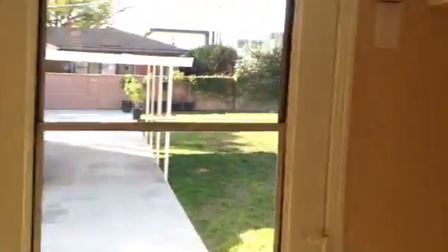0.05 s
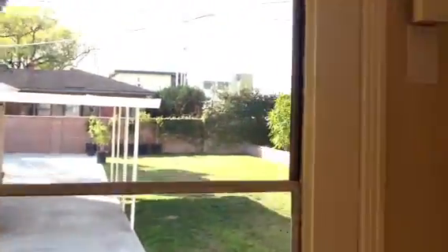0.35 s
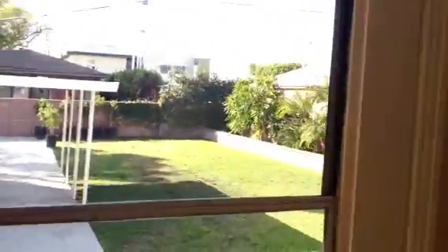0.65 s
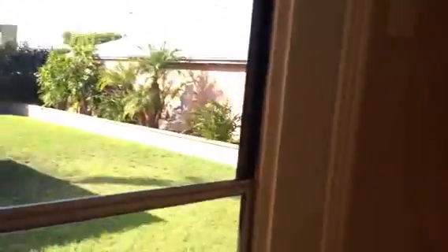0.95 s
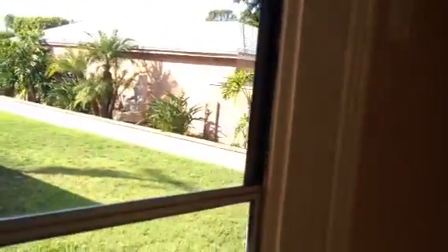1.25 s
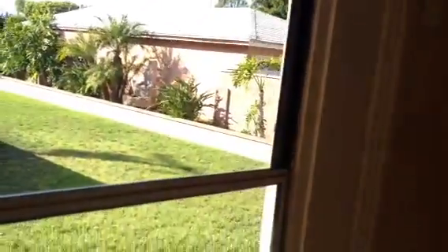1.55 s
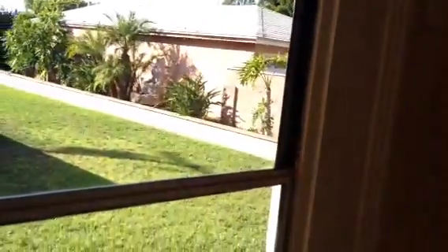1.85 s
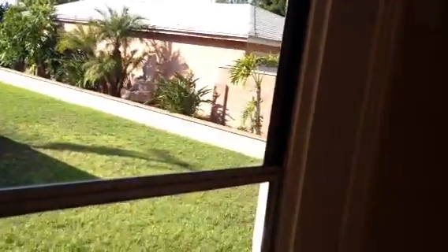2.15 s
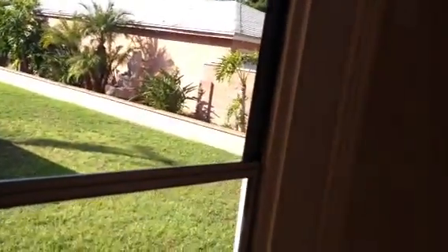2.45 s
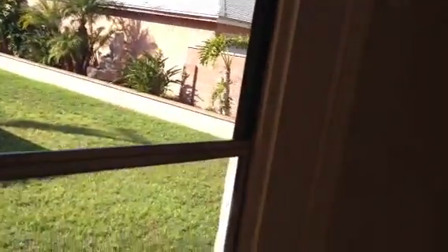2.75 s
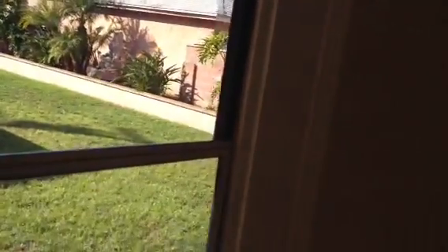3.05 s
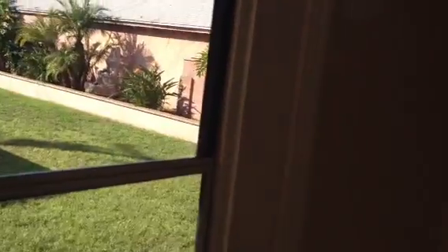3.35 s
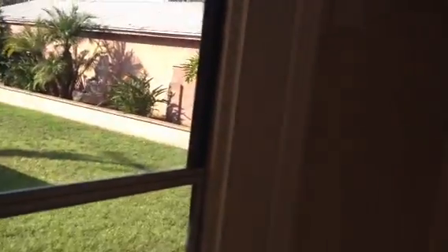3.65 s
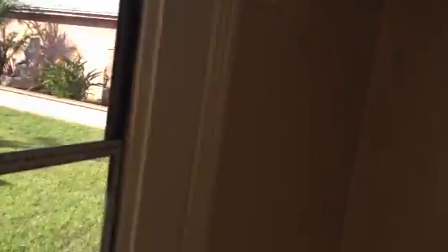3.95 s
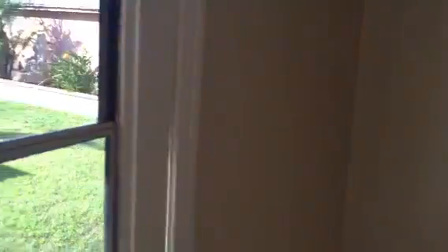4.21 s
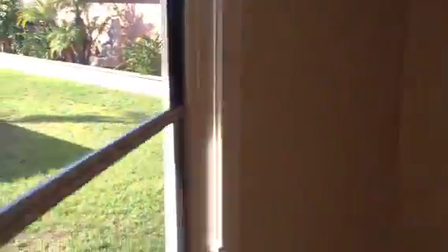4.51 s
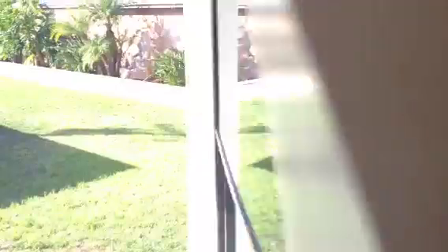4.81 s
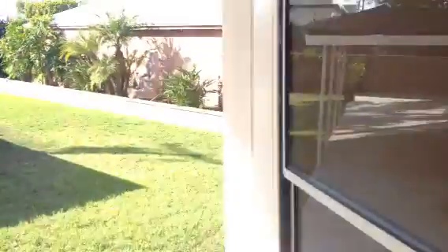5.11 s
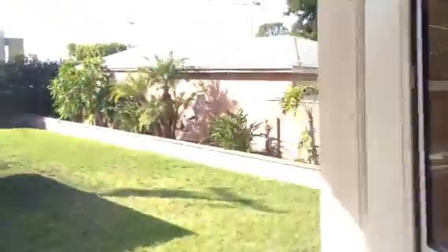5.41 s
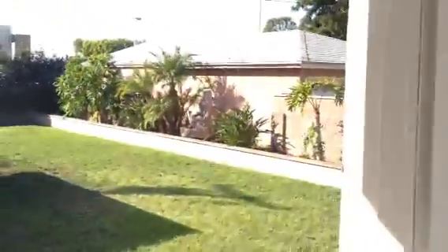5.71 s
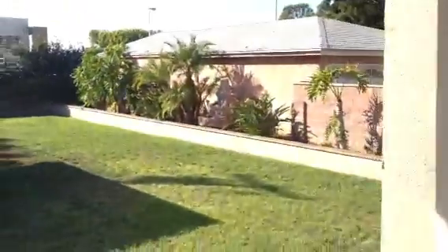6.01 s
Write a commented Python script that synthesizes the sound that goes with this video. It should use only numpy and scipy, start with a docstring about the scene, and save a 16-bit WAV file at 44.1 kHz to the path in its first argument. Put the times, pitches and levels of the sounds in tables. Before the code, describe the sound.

A glazed wooden door is unlocked and pulled open, its latch clicking and its tight edge scraping in a small room.

```python
"""A small hard-walled room: close by, a glazed wooden back door is unlocked and pulled open.
Sleeves brush, steps thud softly and the door bumps in its frame. Latch and bolt click, and the
jarred, loose handle clinks. The tight edge sticks and slips, rasping, scraping and shaking the
panel until the door swings free. Far traffic and a low hum from the garden grow as it opens."""
import sys
import numpy as np
from scipy import signal
from scipy.fft import rfft, irfft, next_fast_len
from scipy.io import wavfile
from scipy.ndimage import map_coordinates

SR = 44100
rng = np.random.default_rng(int(sys.argv[2]) if len(sys.argv) > 2 else 0)


def store_wav(level_fs):
    """Save 16-bit WAV to argv[1]."""
    pcm = np.round(np.clip(np.atleast_2d(level_fs), -1, 1) * 32767)
    wavfile.write(sys.argv[1], SR, pcm.T.astype(np.int16))


N = 267731
TIME = np.arange(N) / SR
RING_TIME = TIME[:SR * 3 // 5]


def amp(db):
    """Decibels to gain."""
    return 10 ** (np.asarray(db) / 20)


def unit_rms(x):
    """Scale to rms 1."""
    return x / np.sqrt(np.mean(x ** 2) + 1e-20)


def fade(t, t60):
    """Exponential decay, 60 dB in t60."""
    return np.exp(-np.log(1000) * t / t60)


def stroke(start_s, length_s, attack_s, t60_s):
    """Envelope: linear rise, decay once the length is over."""
    release = fade(np.maximum(TIME - start_s - length_s, 0), t60_s)
    return np.clip((TIME - start_s) / attack_s, 0, 1) * release


def along(points, hz):
    """Interpolate (Hz, value) points on a log axis."""
    f, v = np.transpose(points)
    return np.interp(np.log(hz + 1), np.log(f), v)


def wobble(rate_hz):
    """Smooth random curve with knots at rate_hz."""
    return map_coordinates(rng.standard_normal(int(N * rate_hz / SR) + 4), [TIME * rate_hz])


def add(track, time_s, sound):
    """Mix a sound in at time_s."""
    start = max(round(time_s * SR), 0)
    track[start:start + len(sound)] += sound[:N - start]


def through(x, response):
    """Convolve, keeping the length."""
    return signal.fftconvolve(x, response)[:len(x)]


def colour(spectrum, size=2048):
    """Minimum-phase impulse response of a spectrum, energy 1."""
    gain = amp(along(spectrum, np.fft.rfftfreq(size, 1 / SR)))
    cepstrum = irfft(np.log(gain + 1e-6))
    cepstrum[1:size // 2] *= 2
    cepstrum[size // 2 + 1:] = 0
    response = irfft(np.exp(rfft(cepstrum)))
    return response / np.linalg.norm(response)


def resonator(modes, size=8192):
    """High-passed impulse response of damped modes, energy 1."""
    t = TIME[:size]
    response = np.zeros(size)
    for k, (hz, width_hz, db) in enumerate(modes):
        envelope = amp(db) * width_hz * np.exp(-np.pi * width_hz * t)
        response += (-1) ** k * envelope * np.sin(2 * np.pi * hz * t)
    response = signal.sosfilt(signal.butter(2, 110, "high", fs=SR, output="sos"), response)
    return response / np.linalg.norm(response)


def noise(spectrum):
    """Coloured noise, rms 1."""
    return unit_rms(through(rng.standard_normal(N), colour(spectrum, size=8192)))


# Room decay: (frequency [Hz], t60 [s])
ROOM_DECAY = [(100, 0.51), (260, 0.9), (700, 0.74), (1800, 0.61), (5000, 0.64), (13000, 0.49)]

def room_tail():
    """Fresh diffuse tail, energy 1; the low mids last longest."""
    hz, _, bands = signal.stft(rng.standard_normal(len(RING_TIME)), SR, nperseg=256)[:3]
    frame_s = np.arange(bands.shape[1]) * 128 / SR
    bands *= fade(frame_s, along(ROOM_DECAY, hz)[:, None])
    tail = signal.istft(bands, SR, nperseg=256)[1][:len(RING_TIME)]
    near_walls = 1 + 1.1 * fade(RING_TIME, 0.1)
    tail *= (1 - np.exp(-RING_TIME / 0.001)) * near_walls
    return tail / np.linalg.norm(tail)


def in_room(x, wet_db):
    """Add reverberation at about constant power."""
    return (x + amp(wet_db) * through(x, room_tail())) / np.hypot(1, amp(wet_db))


# Room at rest: (frequency [Hz], level [dB])
HUSH_SPECTRUM = [(25, -23), (60, -17), (100, -22), (155, -13), (260, -3.5), (330, -7), (480, -2.5),
                 (750, -5), (1200, -8.5), (2200, -14), (5000, -18.5), (10000, -24), (15000, -24)]
# Far traffic: (frequency [Hz], level [dB])
TRAFFIC_SPECTRUM = [(30, -23), (65, -41), (100, -4.5), (160, -4.5), (240, 1), (330, -7.5), (560, -12),
                    (800, -2), (1100, -7), (1500, -9.5), (2000, -18.5), (4000, -62), (9000, -59)]

def background(shut_db=-67.5, open_db=-56.5, opens_at_s=4.46, swing_s=0.84):
    """Room hush, plus traffic and a wavering hum that grow as the door opens."""
    hum_hz = 167 + 2 * wobble(14)
    hum = np.sin(2 * np.pi * np.cumsum(hum_hz) / SR) * amp(-4 + 1.5 * wobble(8))
    traffic = noise(TRAFFIC_SPECTRUM) * amp(0.8 * wobble(5))
    hush = noise(HUSH_SPECTRUM) * amp(0.7 * wobble(4))
    opening = np.clip((TIME - opens_at_s) / swing_s, 0, 1)
    return amp(shut_db + (open_db - shut_db) * opening) * (traffic + hum) + amp(-61) * hush


# Cloth friction: (frequency [Hz], level [dB])
CLOTH_SPECTRUM = [(300, -20), (900, -3), (2000, 3), (3500, 2), (8000, -3.5), (10000, -8), (15000, -12.5)]
# Sleeve strokes: (start [s], length [s], level [dB])
SLEEVE_STROKES = [(-.05, 0.12, -56), (0.091, 0.039, -55), (0.244, 0.22, -62.5), (0.687, 0.081, -46.5),
                  (0.794, 0.4, -59.5), (1.068, 0.064, -50), (4.978, 0.14, -56.5), (5.291, 0.099, -55.5),
                  (5.41, 0.15, -53.5)]

def sleeves():
    """Cloth brushes past the door in uneven swells of noise."""
    strokes = sum(amp(db) * stroke(start_s, length_s, attack_s=0.058, t60_s=0.43)
                  for start_s, length_s, db in SLEEVE_STROKES)
    return amp(-3 + 2.2 * wobble(35)) * strokes * noise(CLOTH_SPECTRUM)


# Steps and soft bumps: (time [s], level [dB], frequency [Hz])
SOFT_THUDS = [(0.308, -43, 153), (0.693, -46, 205), (1.082, -36, 139), (1.248, -40, 131),
              (2.548, -35.5, 134), (3.848, -40, 150), (4.011, -31, 156), (5.14, -44, 139),
              (5.209, -42, 101), (5.259, -41, 131), (5.789, -45.5, 132)]

def thuds():
    """Soft, heavy contacts give a few dull cycles."""
    out = np.zeros(N)
    envelope = fade(RING_TIME, 0.035) * (1 - np.exp(-RING_TIME / 0.011))
    for time_s, db, hz in SOFT_THUDS:
        add(out, time_s, amp(db + 12.5) * envelope * np.sin(2 * np.pi * hz * RING_TIME))
    return in_room(out, wet_db=-2.5)


# Frame clack: (frequency [Hz], level [dB])
CLACK_SPECTRUM = [(40, -83), (150, -14.5), (450, 6.5), (650, 3), (900, 10.5), (1400, 8), (2050, 5.5),
                  (3000, -1), (4800, 0), (7000, -0.5), (16000, -23)]
# Lock metal snap: (frequency [Hz], level [dB])
SNAP_SPECTRUM = [(2000, -24), (5000, -2), (7500, 18.5), (9300, 9.5), (12000, 6), (15000, 0.5)]
# Door panel: (frequency [Hz], width [Hz], level [dB])
PANEL_MODES = [(160, 30, -3), (210, 26, 2), (270, 24, -.5), (350, 70, -6.3), (485, 100, -6)]
# Bolt and strike plate: (frequency [Hz], width [Hz], level [dB])
BOLT_MODES = [(1150, 200, -62), (1724, 650, 5), (2420, 1500, 0.5), (2764, 150, 8.5), (4360, 920, 1),
              (5020, 480, 7), (6600, 700, -2)]

def knocks(contacts, room_db, thud_db, reference_db=-24):
    """Short cracks excite frame, panel and lock; room_db and thud_db hold at the reference strength."""
    out = np.zeros(N)
    clack, snap = colour(CLACK_SPECTRUM), colour(SNAP_SPECTRUM)
    panel, bolt = resonator(PANEL_MODES), resonator(BOLT_MODES)
    blow = fade(RING_TIME, 0.01) * (1 - np.exp(-RING_TIME / 0.0008))
    for time_s, db, snap_db in contacts:
        # Harder contacts: more bolt and loose-part chatter, less thud and room.
        excess_db = db - reference_db
        hardness = 1 / (3.5 + np.exp(-(db + 7) / 3))
        chatter = sum(np.roll(blow, int(delay_s * SR)) for delay_s in rng.uniform(0.0034, 0.0196, 3))
        crack = rng.standard_normal(len(RING_TIME)) * (blow + amp(-14 + 0.16 * excess_db) * chatter)
        crack /= np.linalg.norm(crack)
        echo = amp(room_db - 0.067 * excess_db) * room_tail()
        frame = (1 - 1.64 * hardness) * through(crack + echo, clack)
        body = through(crack + echo, 2.82 * hardness * bolt + amp(thud_db - 0.64 * excess_db) * panel)
        # Hard, near metal: shorter and drier.
        tick = crack * fade(RING_TIME, 0.016)
        metal = amp(snap_db) * through(1.2 * tick / np.linalg.norm(tick) + amp(-7) * echo, snap)
        add(out, time_s, amp(db) * (frame + body + metal))
    return out


# Door against frame: (time [s], strength [dB], relative snap [dB])
DOOR_BUMPS = [(.335, -41, -8), (.69, -45.5, -22), (.946, -18.5, -0.5), (1.246, -37, -8), (1.436, -29.5, -1),
              (2.316, -23, -2), (2.846, -20, -10), (3.125, -24, -9), (3.278, -14.5, 3), (3.715, -20, 1.5),
              (3.835, -25.5, 8.5), (3.966, -17.5, 8), (4.401, -24, -10), (4.427, -21.5, -2),
              (4.494, -23, 2.5)]

def door_bumps():
    """The whole door knocks in its frame, woody and reverberant."""
    return knocks(DOOR_BUMPS, room_db=11, thud_db=-4)


def slips(rate_hz, spread_db):
    """Stick-slip: irregular jerks of random size, rms 1."""
    size = amp(spread_db * np.clip(rng.standard_normal(N), -2, 2)) * rng.choice([-1, 1], N)
    return unit_rms((rng.random(N) < rate_hz / SR) * size)


# Edge catches: (start [s], length [s], level [dB], frequency [Hz], width [Hz])
EDGE_RASPS = [(0.944, 0.04, -47, 783, 90), (1.507, 0.016, -41, 950, 218), (1.539, 0.042, -40.5, 970, 218),
              (1.92, 0.072, -51, 450, 120), (2.097, .02, -45.5, 304, 250), (2.199, 0.067, -52.5, 404, 250),
              (2.512, 0.015, -36, 6000, 400), (2.918, .035, -41, 390, 200), (3.045, 0.036, -44, 440, 250),
              (3.714, 0.016, -38.5, 491, 158), (3.827, 0.052, -39, 465, 90), (4.002, 0.037, -30, 4930, 350),
              (4.017, 0.096, -37.5, 1450, 398), (4.16, 0.07, -32, 1335, 180),
              (4.187, 0.036, -38, 4880, 200), (4.199, 0.12, -39.5, 1760, 603)]

def edge_rasps():
    """Where the edge catches, a swell of quick slips drives one resonance."""
    out = np.zeros(N)
    for start_s, length_s, db, hz, width_hz in EDGE_RASPS:
        progress = np.clip((TIME - start_s) / length_s, 0, 1)
        swell = np.sqrt(np.abs(np.sin(np.pi * progress)))
        rasp = through(slips(rate_hz=780, spread_db=5), resonator([(hz, width_hz, 0)]))
        out += amp(db) * swell * rasp
    return in_room(out, wet_db=-5.5)


# Lock handle: (frequency [Hz], level [dB], t60 [s])
HANDLE_MODES = [(2985, 0, 0.41), (5640, 0, 0.87), (5770, -3, 0.35), (7900, -23, 0.61), (7980, -6.5, 0.21),
                (8600, -18, 0.15), (9850, 2, 0.043), (9600, -20, .25), (12600, 2, 0.15), (12300, 6, 0.13),
                (13800, 6, 0.068), (14950, -7, .18)]
# Handle jolts: (time [s], level [dB], excitation centre [Hz])
HANDLE_JOLTS = [(0.947, -36, 8100), (1.438, -53, 3040), (1.551, -35.5, 8200), (1.556, -63, 14000),
                (1.517, -55, 5750), (1.582, -58, 8400), (1.558, -55, 3000), (1.665, -59, 3000),
                (2.061, -33, 9800), (2.103, -42, 13600), (2.205, -50, 5750), (2.916, -45, 5800),
                (2.925, -29, 8000), (2.939, -29, 9700), (3.052, -31.5, 7960), (3.067, -44, 9800),
                (3.124, -61, 5750), (3.717, -29, 7960), (4.427, -32.5, 7700), (4.556, -54, 3050)]

def handle_clinks(scatter_db=2, reach_oct=0.13):
    """The jarred handle rings; each contact favours the modes near its own pitch."""
    out = np.zeros(N)
    hz, mode_db, t60_s = np.transpose(HANDLE_MODES)[:, :, None]
    for time_s, db, centre_hz in HANDLE_JOLTS:
        favour = 0.066 + np.exp(-0.5 * (np.log2(hz / centre_hz) / reach_oct) ** 2)
        strength = favour * amp(mode_db + scatter_db * rng.standard_normal(hz.shape))
        # Buzzing in the loose seat blurs each mode.
        drift_rad = 0.14 * np.cumsum(rng.standard_normal((len(hz), len(RING_TIME))), axis=1)
        modes = np.sin(2 * np.pi * hz * RING_TIME + drift_rad)
        ring = np.sum(strength * fade(RING_TIME, t60_s) * modes, axis=0)
        echo = amp(-4) * through(ring, room_tail())
        add(out, time_s, amp(db - 0.5) * (ring + echo))
    return out


# Latch and bolt contacts: (time [s], strength [dB], relative snap [dB])
LOCK_CLICKS = [(1.259, -38.5, 2), (1.45, -32, 0), (1.515, -21, -18), (1.551, -19, -1), (1.666, -25.5, -10),
               (1.688, -28, 9.5), (1.751, -25, -7), (1.908, -25.5, -14), (2.036, -24, -3), (2.062, -12, -2),
               (2.103, -16, -3), (2.206, -19.5, 5), (2.383, -20, 1), (2.442, -7, -19), (2.451, -24, -19),
               (2.518, -18, 5), (2.709, -27, 6), (2.866, -4.5, -2), (2.937, -17.5, 4), (3.048, -11.5, -4),
               (3.176, -21.5, -7), (3.274, -1.5, -14), (3.408, -8, -9), (3.4406, -6.5, 0.5),
               (3.926, -8.5, -3), (3.938, -3.5, -3), (3.943, -17.5, 11.5), (4.014, -18, -1),
               (4.041, -6.5, -5.5), (4.096, -15, -7), (4.174, -7, -8), (4.215, -10.5, -4.5),
               (4.557, -19, -13)]

def lock_clicks():
    """Latch and bolt strike sharply, with less wood and room than the bumps."""
    return knocks(LOCK_CLICKS, room_db=3.5, thud_db=-8)


# Edge grit: (frequency [Hz], level [dB])
GRIT_SPECTRUM = [(250, -13), (450, -8), (660, 5), (950, 3.5), (1500, 5.5), (2200, 4), (3000, 1.5),
                 (4900, 1), (7500, -2), (10000, -7.5), (14000, -11.5), (16000, -23)]
# Edge drags on the frame: (start [s], length [s], grit [dB], judder [dB])
EDGE_DRAGS = [(1.554, 0.02, -47, -49), (1.61, 0.12, -59, -54), (2.065, .02, -40, -46),
              (2.129, 0.088, -44.5, -47.5), (2.363, .16, -41.5, -42), (2.616, 0.077, -58, -59),
              (2.877, 0.044, -35.5, -45.5), (3.815, 0.051, -34, -40), (3.925, 0.036, -31.5, -37.5),
              (3.998, 0.082, -36, -51), (4.136, 0.12, -39, -43), (4.402, 0.072, -53, -47.5),
              (4.647, 0.44, -62, -59)]

def edge_scrapes(attack_s=0.018, grit_t60_s=0.14, judder_t60_s=0.26):
    """The dragging edge grips and lets go rapidly, shedding grit and shaking the panel."""
    grip = unit_rms(amp(4 * np.clip(wobble(70), -1.5, 1.5)))
    rubbing, shaking = np.zeros((2, N))
    for start_s, length_s, grit_db, judder_db in EDGE_DRAGS:
        rubbing += amp(grit_db) * stroke(start_s, length_s, attack_s, grit_t60_s)
        shaking += amp(judder_db) * stroke(start_s, length_s, attack_s, judder_t60_s)
    grit = through(slips(rate_hz=1800, spread_db=0.5), colour(GRIT_SPECTRUM)) * rubbing
    judder = through(slips(rate_hz=500, spread_db=5), resonator(PANEL_MODES)) * shaking
    return amp(-0.5) * (in_room(grip * grit, wet_db=0) + in_room(judder, wet_db=6))


def scene():
    """All sources, mono."""
    mix = background() + sleeves() + thuds() + door_bumps()
    mix += edge_rasps() + handle_clinks() + lock_clicks() + edge_scrapes()
    return mix[None]


def record(dry, low_cut_hz=65, top_hz=15550):
    """A small microphone: no deep bass, nothing above its band limit."""
    thin = signal.sosfilt(signal.butter(2, low_cut_hz, "high", fs=SR, output="sos"), dry)
    size = next_fast_len(N + SR // 2)
    passband = np.fft.rfftfreq(size, 1 / SR) < top_hz
    return irfft(rfft(thin, size) * passband, size)[:, :N]


dry = scene()
out = record(dry)
store_wav(out)
```